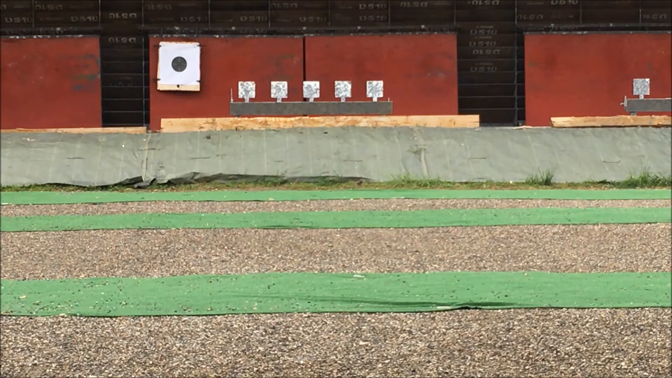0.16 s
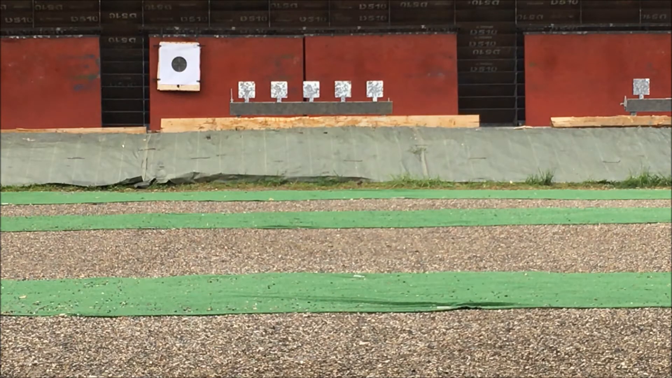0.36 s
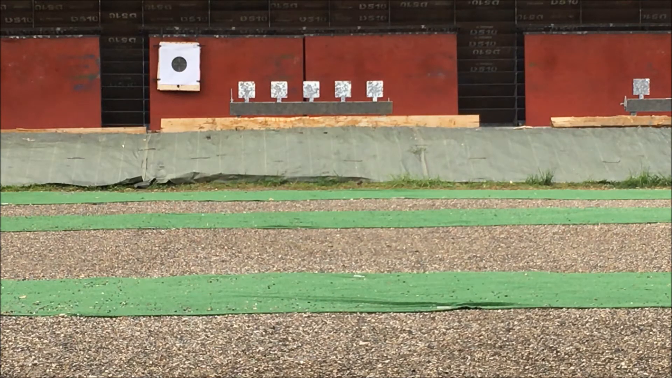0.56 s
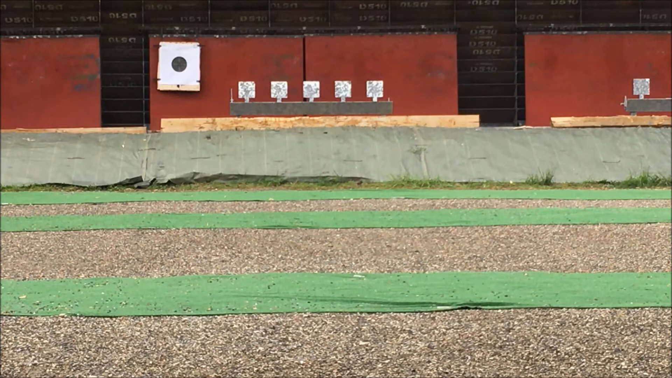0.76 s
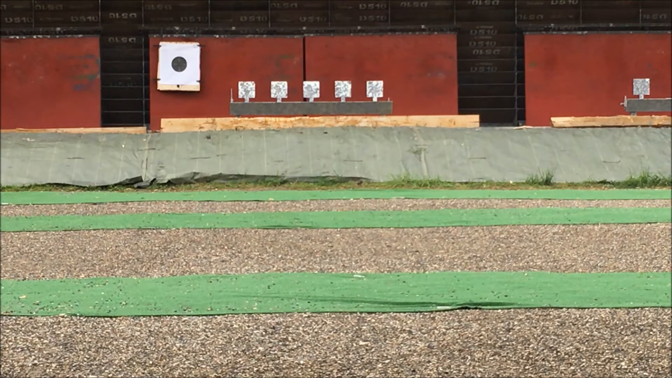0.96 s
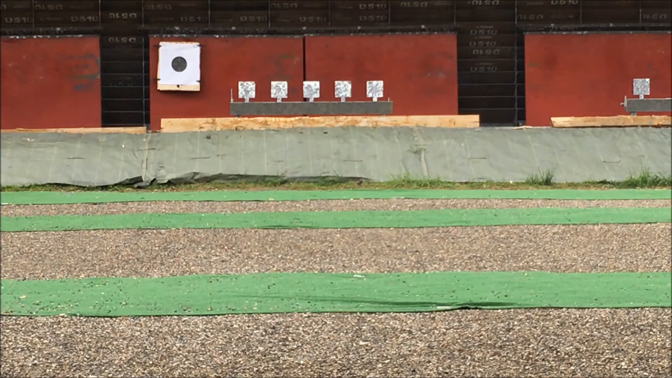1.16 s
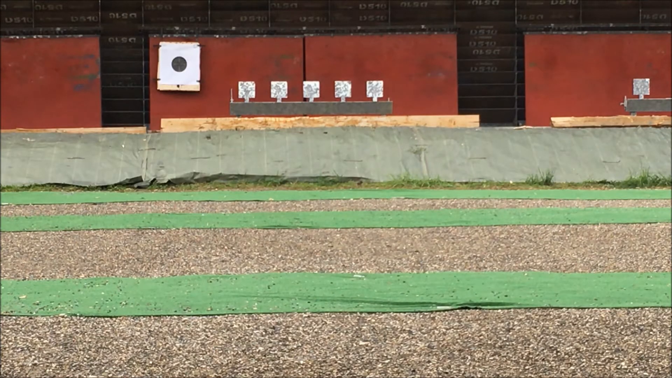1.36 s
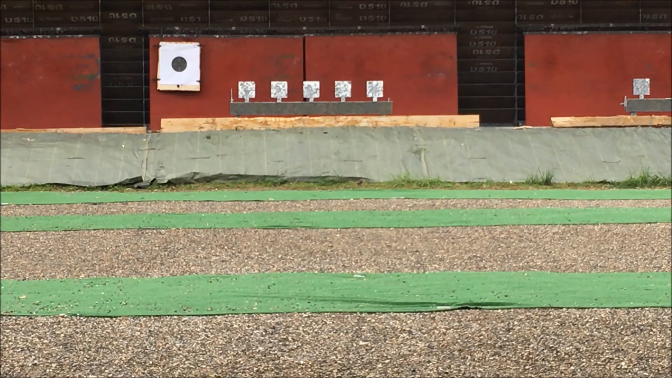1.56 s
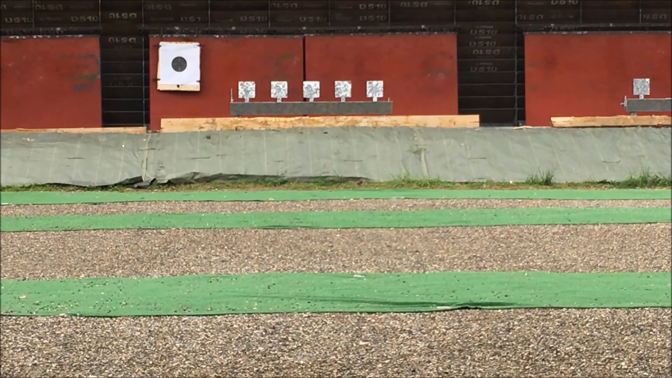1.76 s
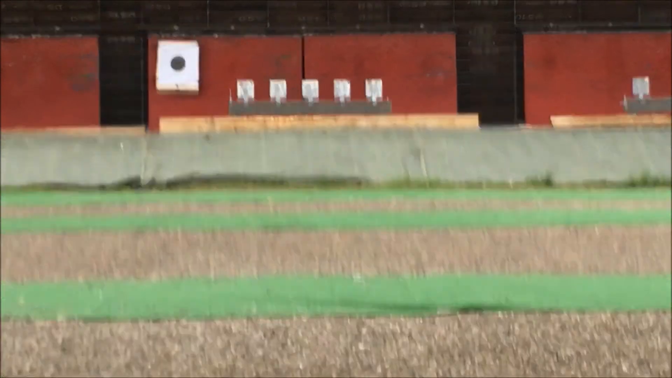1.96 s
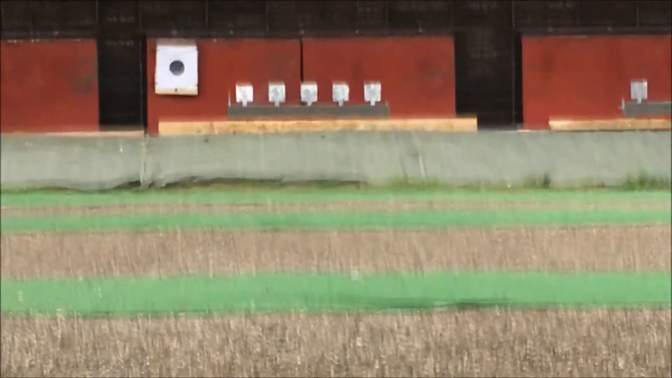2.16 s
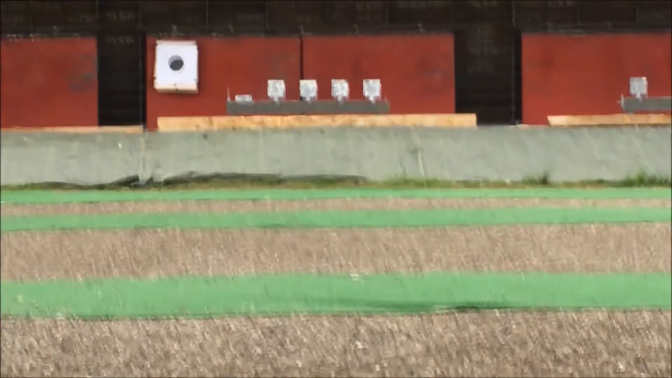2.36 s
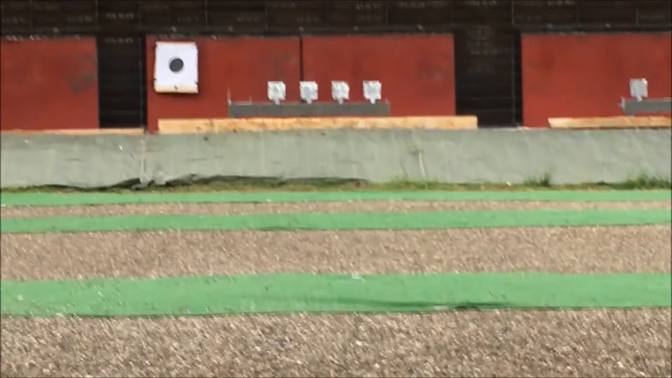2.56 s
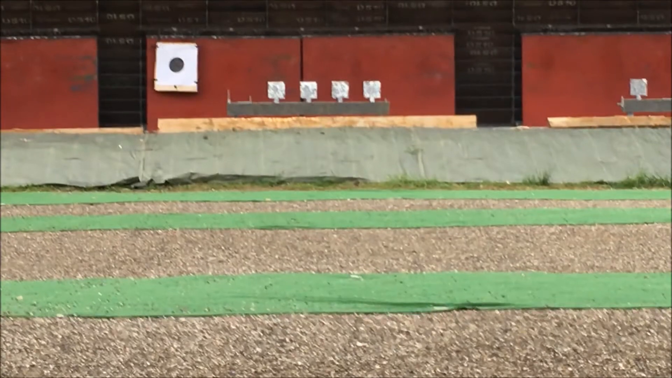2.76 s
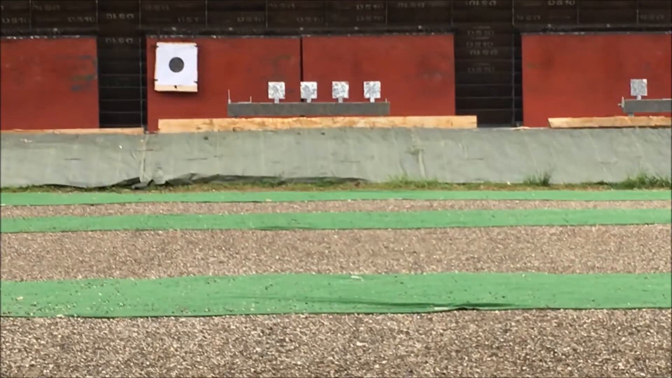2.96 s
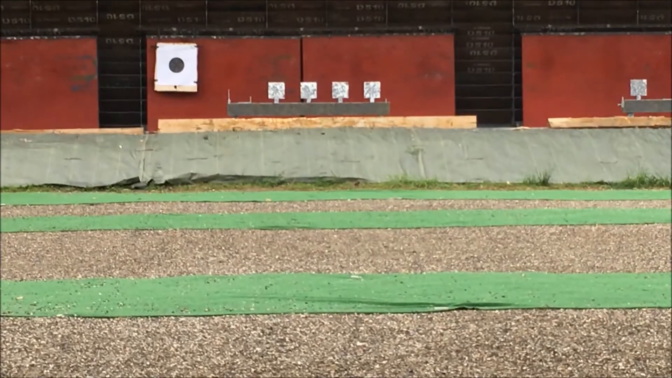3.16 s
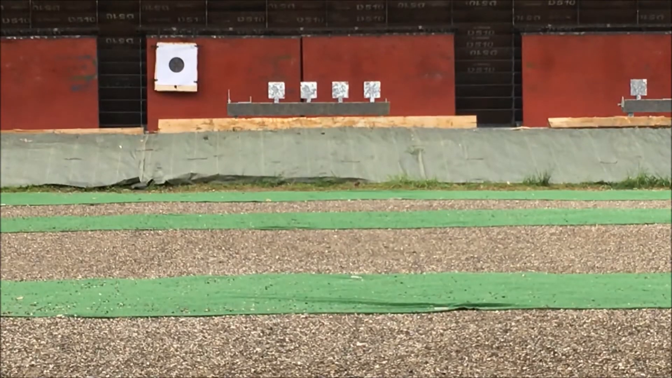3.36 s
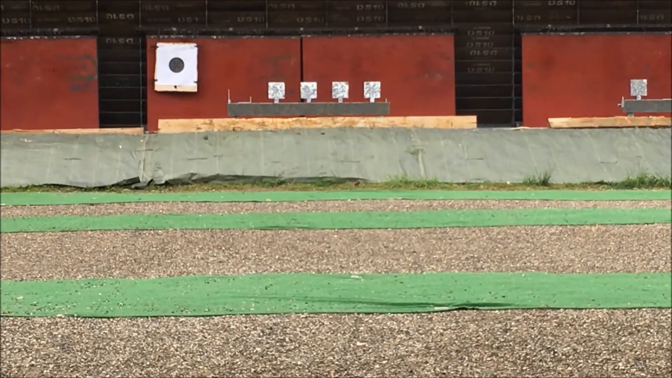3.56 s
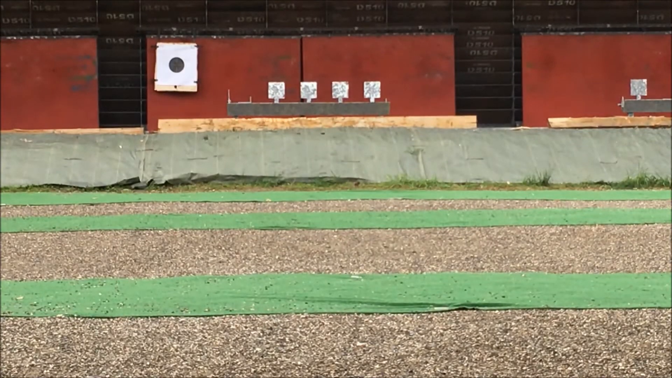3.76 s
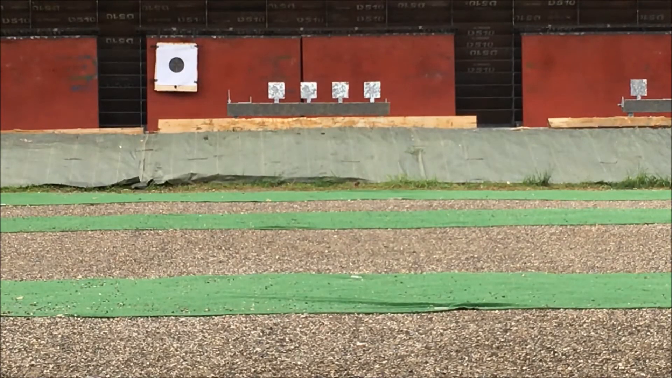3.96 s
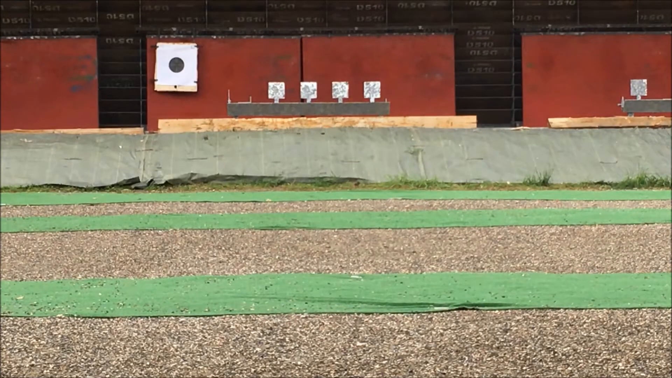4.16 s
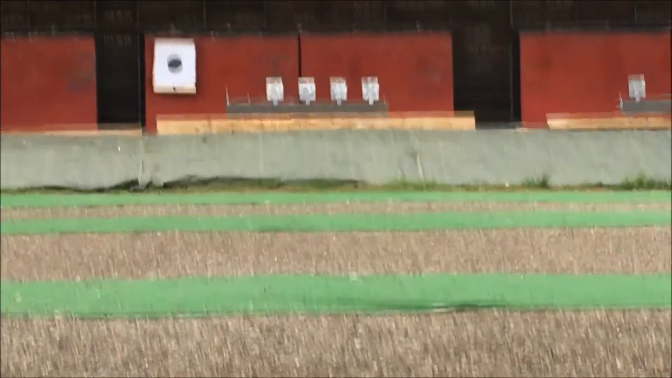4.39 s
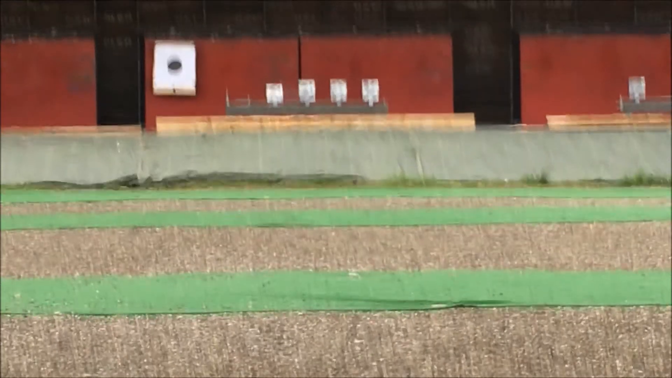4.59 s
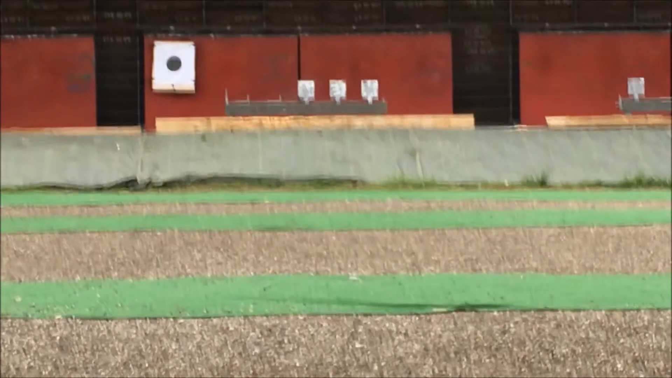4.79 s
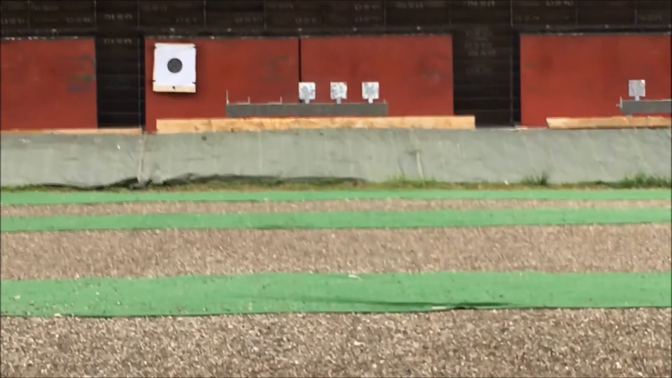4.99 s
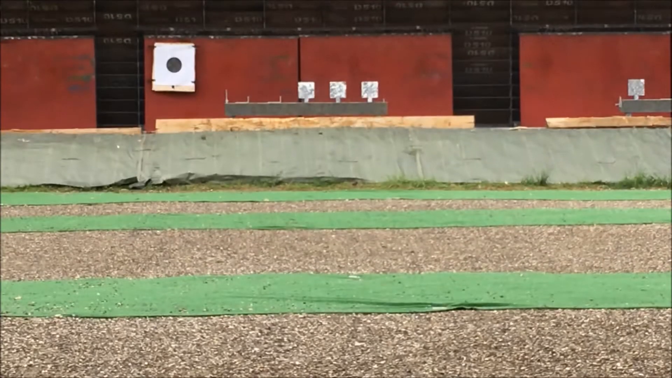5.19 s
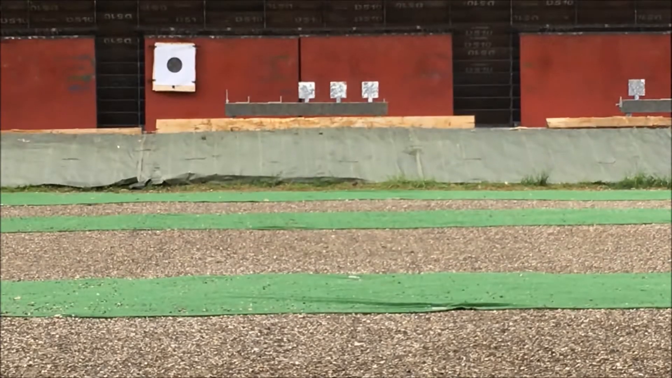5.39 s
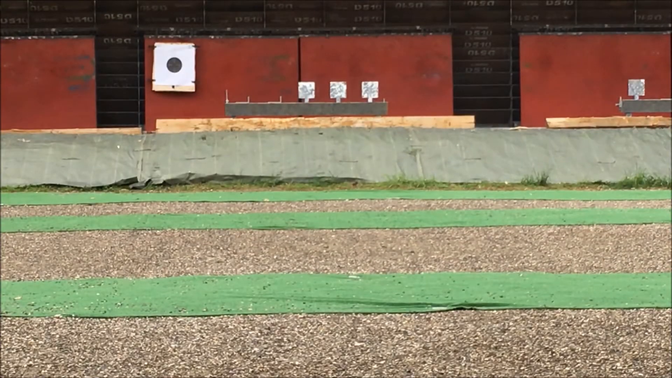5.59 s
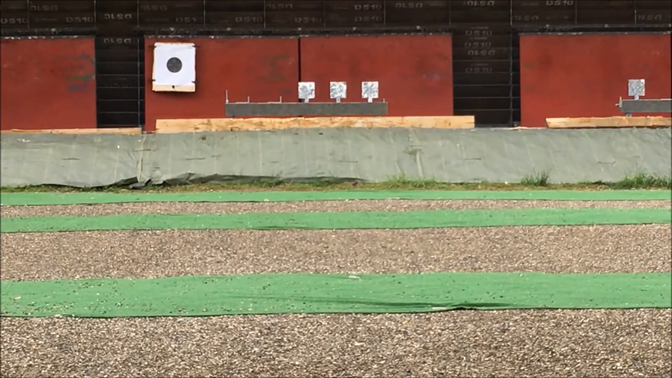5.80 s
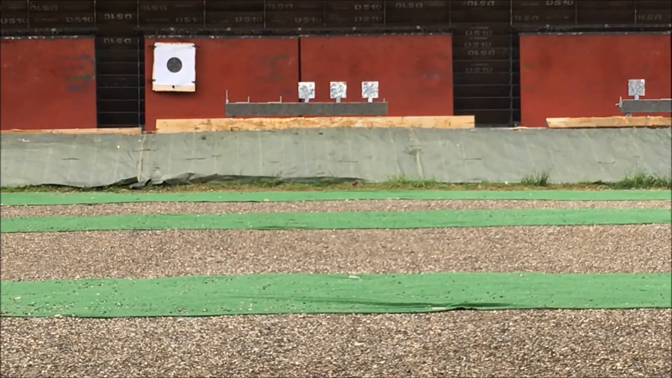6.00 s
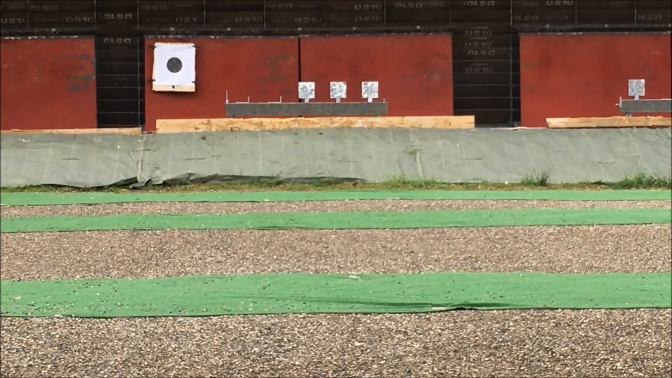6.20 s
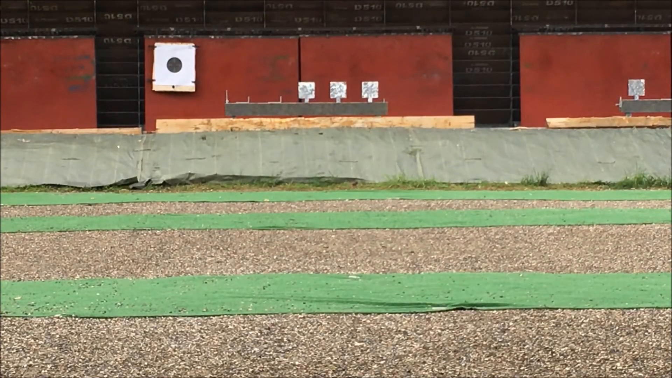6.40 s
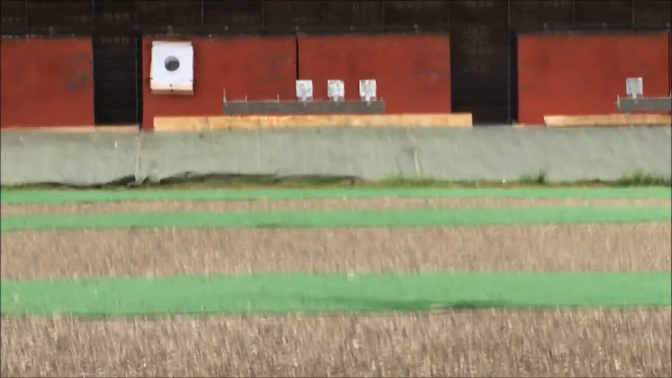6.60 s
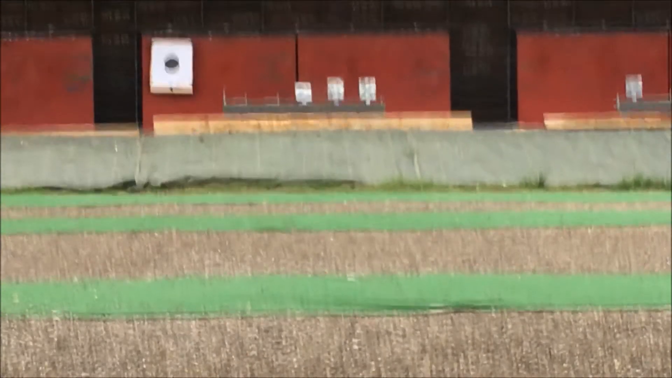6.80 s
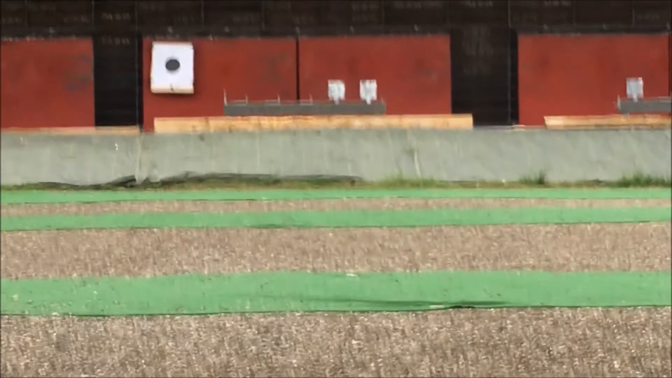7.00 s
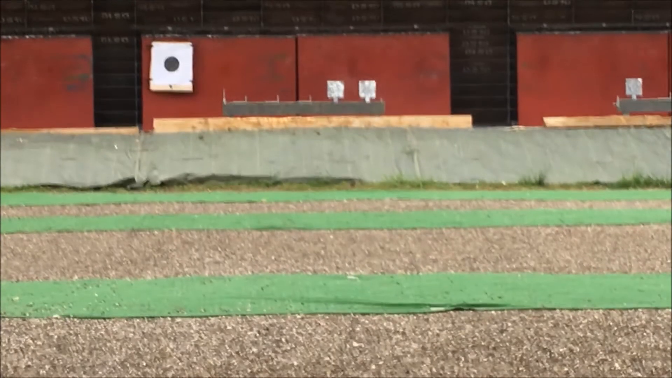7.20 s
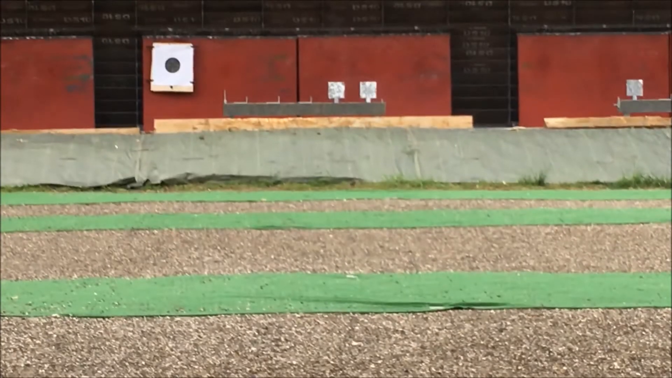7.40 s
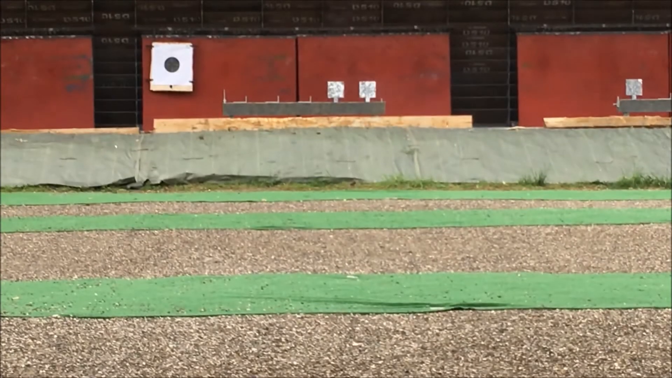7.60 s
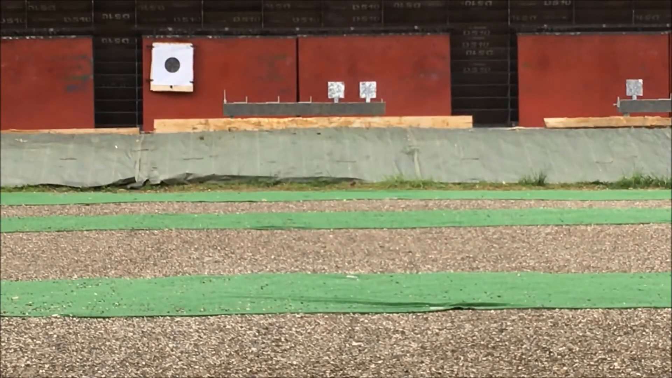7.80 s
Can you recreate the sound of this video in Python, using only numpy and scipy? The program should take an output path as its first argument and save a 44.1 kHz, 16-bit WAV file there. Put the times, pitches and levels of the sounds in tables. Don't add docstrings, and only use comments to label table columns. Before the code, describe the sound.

A nearby pistol cracks three times with hard wall echoes, steel plates ring and drop into stones, brass cases tinkle, and duller distant bangs intrude.

```python
import sys
import numpy as np
from scipy import signal
from scipy.fft import rfft, irfft, next_fast_len
from scipy.io import wavfile
from scipy.ndimage import uniform_filter1d

SR = 44100
rng = np.random.default_rng(int(sys.argv[2]) if len(sys.argv) > 2 else 0)


def store_wav(level_fs):
    pcm = np.round(np.clip(np.atleast_2d(level_fs), -1, 1) * 32767)
    wavfile.write(sys.argv[1], SR, pcm.T.astype(np.int16))


def voltage_ratio(decibels):
    exponent = np.asarray(decibels, float) / 20
    return 10 ** exponent


N = 346185

BANDS_HZ = 22 * 2 ** np.arange(0, 10, .5)
CRACK_S = .0222
# [t/s, level/dB, treble tilt/dB]
NEAR_SHOTS = [
    (2.100, -14, 6.5),
    (4.451, -13, 6),
    (6.674, -12, 6.5),
]


def on_bands(points):
    hz, value = np.transpose(points)
    return np.interp(np.log(BANDS_HZ), np.log(hz), value)[:, None]


def split(noise, colour):
    log_hz = np.log(np.maximum(np.fft.rfftfreq(len(noise), 1 / SR), 1))
    colour_hz, colour_db = np.transpose(colour)
    spectrum = rfft(noise) * voltage_ratio(np.interp(log_hz, np.log(colour_hz), colour_db))
    masks = np.clip(1 - abs(log_hz - np.log(BANDS_HZ)[:, None]) / np.log(2 ** .5), 0, 1)
    bands = irfft(spectrum * masks, len(noise))
    return bands / np.std(bands.sum(axis=0))


def walk(rate, size):
    hold = int(SR / rate)
    steps = np.repeat(rng.standard_normal(size // hold + 1), hold)
    return 1.3 * uniform_filter1d(uniform_filter1d(steps, hold), hold)[:size]


def add(out, start, sound):
    i = int(round(start * SR))
    out[i:i + len(sound)] += sound[:len(out) - i]


def fade(t, t60):
    return voltage_ratio(-60 * t / t60)


def band_noise(noise, low_hz, high_hz, order):
    return signal.sosfilt(signal.butter(order, [low_hz, high_hz], "bandpass", fs=SR, output="sos"), noise)


def bursts(table, spread):
    out = np.zeros(N)
    for start, db, hz, t60 in table:
        t = np.arange(int(t60 * SR)) / SR
        burst = rng.standard_normal(SR // 10)[:len(t)] * fade(t, t60)
        burst = band_noise(burst, hz / spread, min(hz * spread, 18000), 2)
        add(out, start, voltage_ratio(db) * burst / abs(burst).max())
    return out


def swell(db, hz, cycles):
    t = np.arange(int(cycles / hz * SR)) / SR
    return voltage_ratio(db) * np.hanning(len(t)) * np.sin(2 * np.pi * (hz * t + rng.random()))


def four(values):
    return on_bands(list(zip((300, 900, 3000, 10000), values)))


def echo_field(t):
    build = four((-25.5, -28.5, 2, 11)) * np.exp(-t / 0.0069)
    since_crack = np.maximum(t - CRACK_S, 0)
    crack = four((-1.5, 8.5, 22.5, -21.5)) * np.exp(-since_crack / 0.0032) * (t > CRACK_S)
    overload = four((4.5, -1.1, 3.56, -1.5)) - four((1.5, 1.5, 1.5, 57)) * t
    roar_db = overload + build + crack - 214 * np.maximum(t - 0.11, 0)
    return_s, rise_s = 0.159, .015
    back = voltage_ratio(four((-10.5, -9.5, 0, -11)) - 263 * np.maximum(t - return_s, 0))
    back = back * np.clip(1 + (t - return_s) / rise_s, 0, 1)
    wash_s = 0.33
    held_db = -four((37, 133, 140, 8.2)) * np.maximum(wash_s - t, 0)
    wash_db = held_db + four((-8.5, -5.5, -1, -26.5)) - four((33, 55, 37.3, 62)) * (t - wash_s)
    tail_db = held_db + four((-23, -41, -15, -63)) - four((8.5, 5.7, 14.5, 2.6)) * (t - wash_s)
    return np.sqrt(voltage_ratio(roar_db) ** 2 + back ** 2 + voltage_ratio(wash_db) ** 2 + voltage_ratio(tail_db) ** 2)


def near_shots():
    # [f/Hz, level per Hz/dB]
    blast_colour = [(65, -36.5), (110, -12.5), (210, -5.5), (275, -3), (346, -1), (454, -1.5), (748, -0.5),
                    (1160, -5.5), (1290, -8), (2610, -25), (6810, -19), (13800, -24.5), (16000, -34)]
    # [t after shot/s, level/dB, f/Hz, cycles]
    heaves = [(0.058, -16.5, 60.8, 1.5), (0.089, -21, 45, 1.2), (.13, -25, 67, 2.2), (0.174, -26, 55, 2.2)]
    # [t of centre/s, peak level/dB, f/Hz, cycles]
    booms = [
        (2.117, -0.5, 518, 8.5),
        (4.470, -8, 820, 8.5),
        (6.689, -7, 690, 9.24),
    ]
    out, t = np.zeros(N), np.arange(next_fast_len(int(2.3 * SR))) / SR
    field = echo_field(t)
    muffle_db = -23.5 * (BANDS_HZ[:, None] > 3500) * (t < CRACK_S)
    air_db = -40 * np.clip(t - .17, 0, .3) * on_bands([(8000, 0), (11300, 1), (16000, 2.5)])
    walls = rng.standard_normal(len(t))
    for start, db, tilt_db in NEAR_SHOTS:
        bands = split(walls + 0.51 * rng.standard_normal(len(t)), blast_colour)
        tilt = tilt_db * on_bands([(500, 0), (8000, 1)])
        add(out, start, (bands * field * voltage_ratio(tilt + muffle_db + air_db + db)).sum(axis=0))
        for after, heave_db, hz, cycles in heaves:
            add(out, start + after - cycles / hz / 2, swell(heave_db + db + 19, hz, cycles))
    for centre, db, hz, cycles in booms:
        add(out, centre - cycles / hz / 2, swell(db, hz, cycles))
    ticks = [(start + CRACK_S, db + 8, 6700, .01) for start, db, _ in NEAR_SHOTS]
    return out + bursts(ticks, 1.72)


def far_shots():
    # [t/s, level/dB, swell time/s]
    shots = [
        (1.927, -19, 0.0064),
        (5.863, -18.5, 0.0036),
    ]
    # [f/Hz, level per Hz/dB]
    bang_colour = [(59, -28.5), (100, -13.5), (315, 0), (634, -2.5), (752, -5.5), (970, -6), (1130, -9),
                   (1250, -7.5), (1390, -10.5), (8280, -31), (16000, -40)]
    # [f/Hz, t60/s]
    wash_t60 = [(150, 1.86), (400, 0.88), (1000, 1.39), (3000, 1.29), (6000, 1.2), (10000, 0.57)]
    # [t/s, peak level/dB, f/Hz, t60/s]
    slaps = [(1.927, -16.5, 1620, 0.027), (1.927, -20.5, 4230, 0.048), (1.925, -27, 503, .05),
             (1.935, -16.5, 720, 0.092), (1.945, -8, 1060, 0.035), (1.961, -14, 1720, 0.035),
             (1.996, -18, 1180, 0.034), (1.998, -9.5, 1270, 0.021), (2.022, -20, 1500, 0.086),
             (2.059, -23.5, 3520, 0.089), (5.863, -20, 3500, 0.024), (5.878, -19, 930, 0.026),
             (5.898, -22, 2270, 0.025), (5.902, -12, 1010, 0.017), (5.936, -13.5, 1200, .02),
             (5.940, -29, 2480, 0.012), (5.96, -23, 2520, 0.06), (6.005, -23, 1230, 0.044)]
    out, t = bursts(slaps, 1.48), np.arange(next_fast_len(int(1.6 * SR))) / SR
    backstop_s, backstop_db = 0.11, 9.5
    late = np.clip((t - backstop_s) / 0.022, -1, 0)
    late_db = backstop_db * late * on_bands([(1500, 0.15), (4000, 0.94)])
    for start, db, rise in shots:
        bands = split(rng.standard_normal(len(t)), bang_colour) * fade(t, on_bands(wash_t60))
        add(out, start, (1 - np.exp(-t / rise)) * (voltage_ratio(db + late_db) * bands).sum(axis=0))
    return out


def plates():
    # [struck/s, lands/s, ends/s]
    rings = [(2.29, 2.56, 3.8), (4.615, 4.94, 5.9), (6.845, 7.155, 7.85)]
    # [struck level/dB, landing level/dB, fade after landing/(dB/s)]
    ring_levels = [(-35.5, -28, 52), (-37, -31.5, 41), (-30.5, -29.5, 38.5)]
    # [first t/s, half turn/s]
    tumbles = [(2.512, .09), (4.9, .085), (6.905, .089)]
    # [f/Hz, twin lies below by/Hz, twin level/dB, lead of upper modes/s]
    lowest_modes = [(4344, 37, -4, .02), (4334, 20, -22, -.02), (4344, 37, -4, .001)]
    # [f/Hz, level/dB]
    upper_modes = [
        [(7079, -44), (7101, -48), (8075, -53), (8694, -64), (8812, -52), (9432, -63), (11122, -57),
         (11423, -70), (11892, -62), (12414, -70), (13135, -62), (13243, -69), (13351, -63), (13824, -66),
         (14153, -74), (14578, -75), (15084, -83)],
        [(6605, -60), (6864, -57), (7127, -56), (8102, -61), (8856, -58), (8882, -57), (9588, -68),
         (11143, -69), (11289, -72), (12586, -73), (13124, -64), (14616, -79)],
        [(6487, -56), (7090, -44), (7558, -61), (7946, -54), (8070, -57), (8802, -52), (8834, -51), (9846, -68),
         (11111, -51), (11402, -61), (11859, -63), (13076, -62), (13308, -68), (13787, -63), (14169, -76),
         (14605, -63), (14842, -85)],
    ]
    # [f/Hz, level/dB]
    slow_modes = [
        [(1723, -56), (2600, -56), (5329, -56)],
        [(2600, -58), (5356, -54)],
        [(2519, -52), (5313, -54)],
    ]
    out = np.zeros(N)
    for ring, levels, tumble, upper, slow, lowest in zip(
            rings, ring_levels, tumbles, upper_modes, slow_modes, lowest_modes):
        struck, lands, end = ring
        first_db, last_db, fade_db = levels
        edge_on, turn = tumble
        low_hz, twin_hz, twin_db, lead = lowest
        t = np.arange(int((end - struck) * SR)) / SR
        edges = np.clip(np.minimum(t / 0.0027, (t[-1] - t) / 0.078), 0, 1)
        late = np.maximum(t + struck - lands, 0)
        dying = voltage_ratio(-9.5 * np.minimum(late / 0.014, 1) - fade_db * late) + voltage_ratio(-27 - 14 * late)
        turns = np.maximum((t + struck - edge_on) / turn, -.5)
        tumbling = 1 - 0.72 * np.cos(np.pi * turns) ** 2
        falling = voltage_ratio(np.interp(t + struck, [struck, lands], [first_db, last_db]))
        power = (falling * dying * tumbling) ** 2
        low = 1.2 * np.sqrt(power + .25 * uniform_filter1d(power, SR // 8)) * edges
        twin = voltage_ratio(twin_db + 3 * walk(15, len(t))) * np.sin(2 * np.pi * (low_hz - twin_hz) * t)
        drift = 1.2 * walk(20, len(t))
        add(out, struck, low * (np.sin(2 * np.pi * low_hz * t + drift) + twin))
        shapes = []
        for hz, db in upper:
            start_db = db + 7.5 + .6 * (hz / 1000 - 7)
            db_per_s = 48 + 3 * (hz / 1000 - 5)
            shapes.append((hz, start_db - db_per_s * np.maximum(t - .14, 0)))
        for hz, db in slow:
            shapes.append((hz, db + 10 - 60 * np.maximum(t - .3, 0)))
        for hz, shape_db in shapes:
            tumble_db = 3 * walk(20, len(t)) + 3.5 * walk(45, len(t))
            mode = np.sin(2 * np.pi * (hz * t + rng.random()))
            add(out, struck - lead, edges * voltage_ratio(shape_db + tumble_db) * mode)
    return out


def clinks():
    # [t/s, peak level/dB, f/Hz, t60/s]
    strikes = [(2.260, -29, 5350, .012), (2.266, -18, 4100, 0.024), (4.612, -23, 6000, .02),
               (4.625, -17, 5000, 0.039), (6.831, -10.5, 4650, 0.0073), (6.846, -19, 6000, 0.024),
               (5.171, -15, 1840, 0.035), (5.171, -24.5, 4000, 0.02), (5.171, -47, 8000, .012),
               (5.171, -19.5, 890, 0.082)]
    # [t/s, peak level/dB, f/Hz]
    clatter = [(2.339, -23, 7400), (2.38, -25, 6000), (4.687, -23, 8000), (4.737, -22, 2500),
               (4.8, -16, 3600), (4.852, -36, 7500), (6.911, -18, 8040), (7.01, -12, 3494)]
    # [t/s, peak level/dB, f/Hz]
    grit = [(2.014, -46.5, 6000), (2.047, -34, 11000), (3.566, -44, 12000), (3.835, -46, 4300),
            (5.797, -52, 11000), (5.811, -40.5, 9000), (5.903, -33, 8000), (5.981, -33, 6000),
            (5.982, -34, 10500), (6.412, -56, 8800), (6.425, -59, 8750), (6.517, -64.5, 12000),
            (7.566, -40, 6000), (7.566, -58, 12000), (7.768, -60.5, 9000)]
    knocks = [tuple(row) for row in strikes]
    knocks += [tuple(row) + (0.033,) for row in clatter]
    knocks += [tuple(row) + (.008,) for row in grit]
    return bursts(knocks, 1.3)


def spray(table, rise, spread):
    out = np.zeros(N)
    for start, db, t60, hz in table:
        t = np.arange(int(t60 * SR)) / SR
        grains = rng.standard_normal(2 * SR)[:len(t)] * voltage_ratio(1.2 * walk(300, 2 * SR)[:len(t)])
        hiss = band_noise(grains, hz / spread, min(hz * spread, 13000), 1)
        coarse = signal.sosfiltfilt(signal.butter(2, 11000, fs=SR, output="sos"), hiss)
        hiss = coarse + voltage_ratio(-11) * (hiss - coarse) * fade(t, t60 / 1.4)
        add(out, start, voltage_ratio(db) / np.std(hiss) * hiss * np.clip(t / rise, 0, 1) * fade(t, t60))
    return out


def gravel():
    # [t/s, hiss level/dB,
    # t60/s, f/Hz]
    landings = [(2.651, -36, 0.57, 9000), (2.865, -37, 0.46, 8000), (3.07, -51, 0.57, 6400),
                (4.986, -35, 0.7, 10500), (7.16, -34.5, 0.71, 10050), (.1, -66, 0.75, 6000),
                (1.05, -84, 1, 6000)]
    # [t/s, hiss level/dB, t60/s, f/Hz]
    shivers = [(4.66, -49, .9, 11000), (6.88, -47, 0.69, 11000)]
    # [t/s, hiss level/dB, t60/s, f/Hz]
    skids = [(1.89, -57.5, .4, 7000), (3.56, -56.5, .53, 9000), (3.85, -64, .35, 8000),
             (4.005, -64, .4, 8000), (4.11, -66, .33, 9000), (4.30, -68.5, .33, 12100),
             (5.173, -66.5, .34, 11000), (7.83, -73, .2, 11000)]
    # [t/s, level/dB, t60/s, f/Hz]
    rolls = [(3.828, -60, 0.5, 4440), (4.01, -68, .52, 5200), (4.11, -62.5, .7, 5100),
             (4.235, -60.5, 0.46, 4400), (7.71, -71, .82, 10400), (7.24, -36, 0.5, 5430)]
    hits = spray(landings, rise=0.028, spread=5.7) + spray(shivers, rise=0.057, spread=1.4)
    return hits + spray(skids, rise=0.011, spread=1.7) + spray(rolls, rise=0.01, spread=1.07)


def cases():
    # [t/s, ring level/dB, t60/s]
    bounces = [(3.56, -51.5, 0.53), (3.615, -51, 0.3), (3.83, -52.5, 0.61), (3.86, -53, 0.52),
               (4.234, -61.5, 1.8), (4.37, -55, 0.55), (5.174, -49, 0.28), (7.712, -66, 0.78),
               (7.83, -64, .5)]
    case_hz, twin_above_hz = 10562, 45
    out = np.zeros(N)
    for start, db, t60 in bounces:
        t = np.arange(int(t60 * SR)) / SR
        twin = .6 * np.sin(2 * np.pi * ((case_hz + twin_above_hz) * t + rng.random()))
        pair = np.sin(2 * np.pi * case_hz * t) + twin
        roll_db = 4.5 * walk(90, 2 * SR)[:len(t)]
        add(out, start, voltage_ratio(db + roll_db) * pair * fade(t, t60) * np.clip(t / 0.0022, 0, 1))
    return out


def road():
    # [f/Hz, level per Hz/dB]
    hum_colour = [(12, -54.5), (20, -25), (40, -5.5), (74, -2), (142, -15.5), (248, -18.5), (434, -25),
                  (698, -23.5), (1030, -18), (1600, -26), (2300, -30.5), (2900, -43), (5000, -49),
                  (16000, -59.5)]
    # [f/Hz, level/dB]
    duck_db = [(70, -19), (200, -9.5), (450, -5.5), (900, -11.5), (4000, -9)]
    # [t/s, level/dB, f/Hz, half length/s]
    vehicles = [(1.8, 7.5, 274, 0.41), (3.55, 13.5, 300, .4), (4.255, -14, 505, .3), (5.2, 14, 80, 0.055),
                (5.7, -2, 680, 0.25), (6.104, 21.5, 55, 0.31)]
    t = np.arange(N) / SR
    ducked = np.zeros(N)
    for start, *_ in NEAR_SHOTS:
        going_down, coming_back = (t - start - 0.13) / .6, (start + 2.5 - t) / 1.66
        ducked = np.maximum(ducked, np.clip(np.minimum(going_down, coming_back), 0, 1))
    passing_db = 0
    for start, db, hz, half in vehicles:
        octaves = np.log2(BANDS_HZ[:, None] / hz)
        passing_db = passing_db + db * np.exp(-((t - start) / half) ** 2 - (octaves / .8) ** 2)
    bass = on_bands([(70, 0.97), (160, 0.21)])
    alone_db = np.array([walk(6, N) for _ in BANDS_HZ]) * (0.9 + 2.2 * bass)
    flicker_db = 0.42 * walk(1.0, N) + alone_db
    bands = split(rng.standard_normal(next_fast_len(N)), hum_colour)[:, :N]
    return (bands * voltage_ratio(-46.5 + on_bands(duck_db) * ducked + passing_db + flicker_db)).sum(axis=0)


def scene():
    mono = near_shots() + far_shots() + plates() + clinks() + gravel() + cases() + road()
    return np.array([mono, mono])


def roll_off(x):
    return signal.sosfilt(signal.butter(12, 16630, fs=SR, output="sos"), x)


def record(dry):
    thin = signal.sosfilt(signal.butter(2, 32, "highpass", fs=SR, output="sos"), dry)
    thin = thin - .45 * band_noise(thin, 9900, 10900, 1)
    rounded = np.tanh(.9 * thin) / .9
    mix = signal.sosfilt(signal.ellip(8, .2, 40, 15850, fs=SR, output="sos"), rounded)
    return roll_off(mix)


dry = scene()
out = record(dry)
store_wav(out)
```